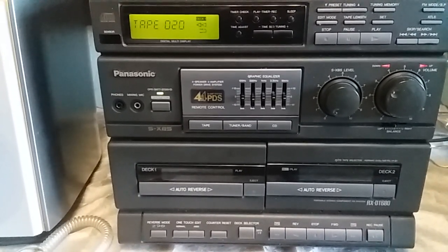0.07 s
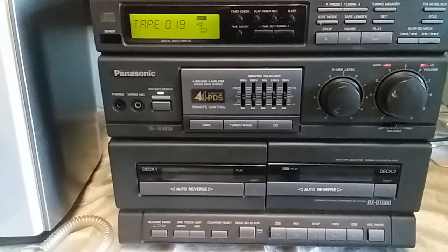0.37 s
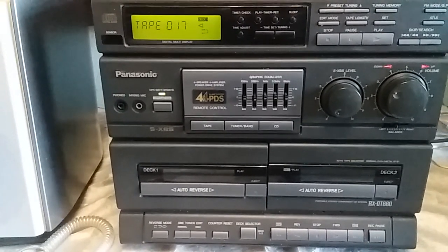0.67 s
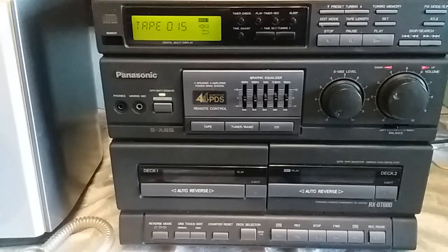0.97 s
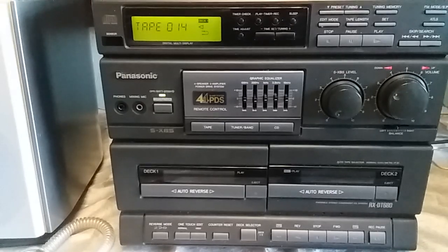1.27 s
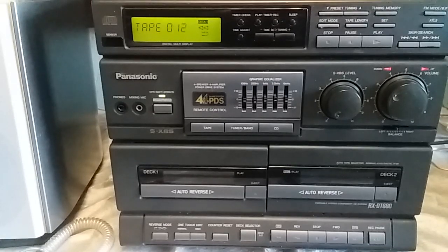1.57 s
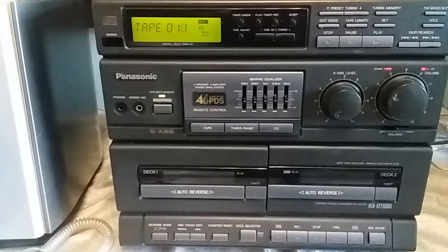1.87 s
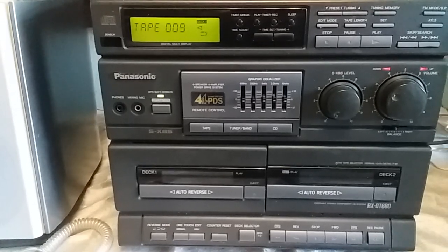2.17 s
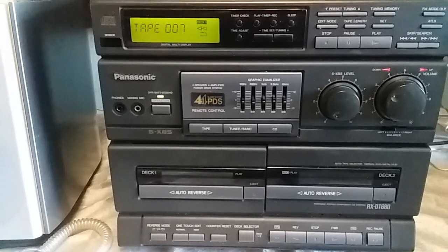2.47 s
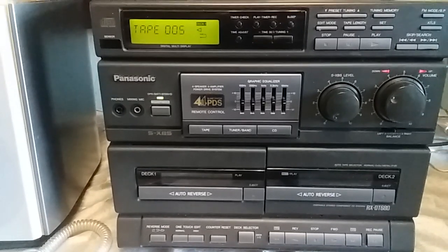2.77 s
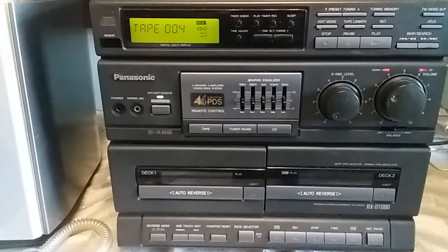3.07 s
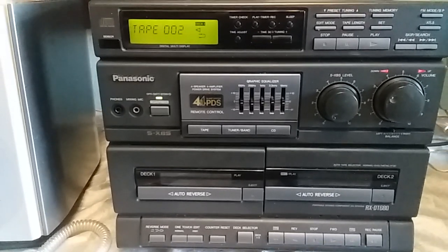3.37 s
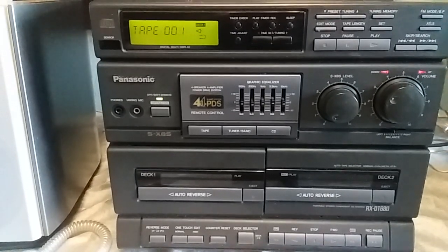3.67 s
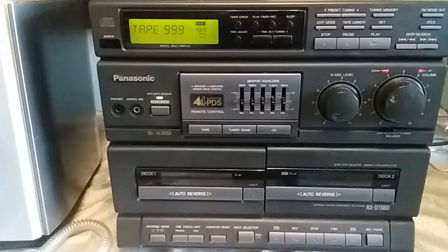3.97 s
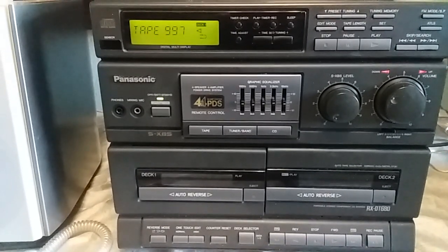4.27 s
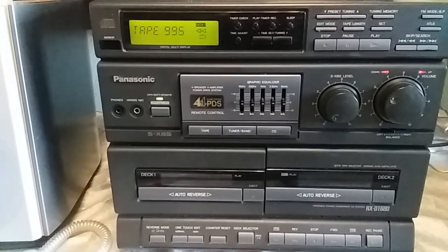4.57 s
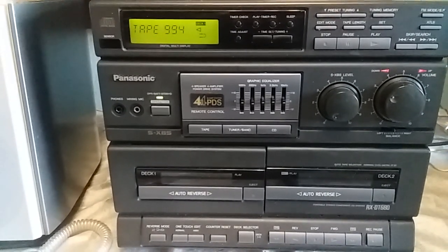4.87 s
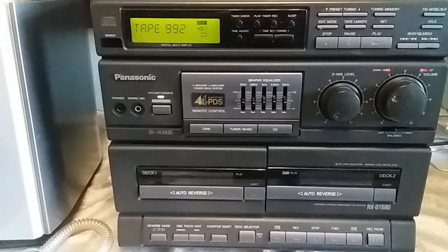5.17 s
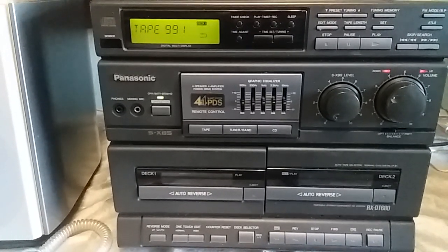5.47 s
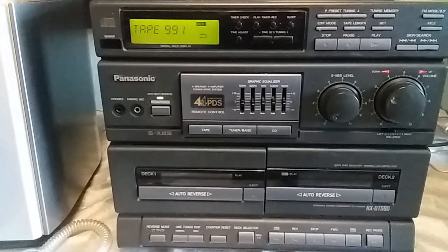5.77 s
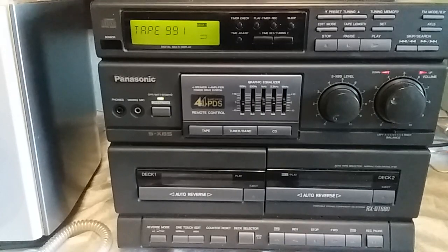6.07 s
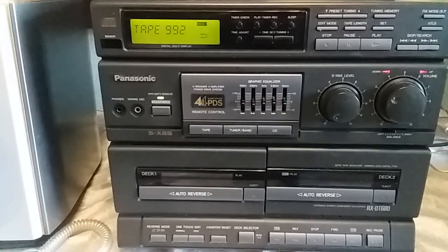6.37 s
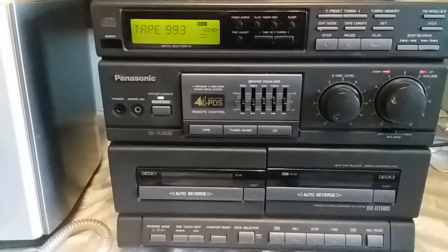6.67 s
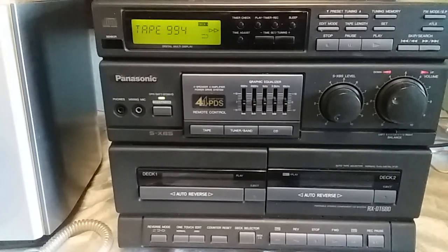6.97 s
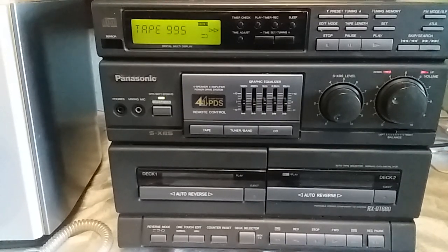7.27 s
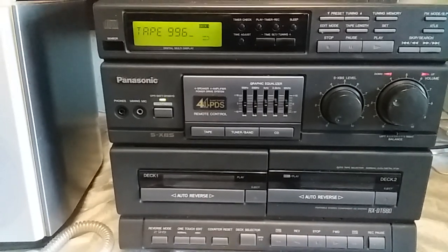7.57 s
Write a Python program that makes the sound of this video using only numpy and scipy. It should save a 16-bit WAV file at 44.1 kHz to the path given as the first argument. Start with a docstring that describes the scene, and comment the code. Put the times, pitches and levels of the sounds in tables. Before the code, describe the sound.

A cassette deck rewinds quickly, its gears whirring in a plastic housing over tape hiss. A low throbbing drone joins as the reel nears its end. The tape runs out, the motor idles briefly, and the mechanism stops with a loud clack. Levers click and a gear grumbles, then a quieter forward wind whines for about a second before a last heavy clack. The deck is heard from straight ahead in a small room.

```python
"""Gear teeth whirr in a plastic shell over tape hiss and motor hum: a cassette deck rewinds in a small room.
The tape pulls tight and the nearly empty reel drones on its spindle. The tape runs out; the motor idles
against its slipping clutch until the head plate clacks to its stop. A grumbling cam trips levers,
a quieter forward wind follows, and a last heavy clack stops the deck. Blows ring chassis and cabinet."""
import sys
import numpy as np
from scipy import signal
from scipy.fft import rfft, irfft
from scipy.io import wavfile
from scipy.ndimage import uniform_filter1d, map_coordinates

SR = 44100
rng = np.random.default_rng(int(sys.argv[2]) if len(sys.argv) > 2 else 0)


def generate_wav(signal):
    """Clip the signal to [-1, 1] and save it as 16-bit WAV at the path in sys.argv[1]."""
    frames = np.transpose(np.atleast_2d(signal))
    scaled = np.clip(frames, -1, 1) * 32767
    pcm = np.round(scaled).astype(np.int16)
    wavfile.write(sys.argv[1], SR, pcm)


N = 335601
TAPS = 16384
T = np.arange(N) / SR
HZ = np.maximum(np.arange(TAPS // 2 + 1) * SR / TAPS, 1)

REEL_HZ = 11.0
TAPE_END_S, LATCH_S, FORWARD_START_S, STOP_S = 4.81, 5.32, 6.27, 7.37
CAM_START_S, CAM_STOP_S = 5.58, 6.26

# Broad spectra: f/Hz, relative level/dB
REWIND_SPECTRUM = [(35, -63), (60, -34), (130, -17), (220, -11), (340, -9), (480, -11), (817, -14.5),
                   (1030, -6.5), (1650, -3.5), (3020, -10.5), (4800, -6), (6000, -15), (8000, -19),
                   (9100, -40)]
ROOM_NOISE_SPECTRUM = [(25, -14.5), (70, 2), (130, -1.5), (300, -7.5), (1000, -4), (3000, -15),
                       (9000, -20.5), (11000, -22.5), (13000, -20), (16000, -13)]
IDLE_SPECTRUM = [(35, -64.5), (60, -35), (129, -7.5), (162, -15.5), (282, -7.5), (307, -16), (371, -5.5),
                 (813, -13), (1070, -1.5), (1190, -5.5), (1740, -6), (2900, -25.5), (4340, -20),
                 (7370, -20), (9500, -53), (12400, -80.5), (20900, -120)]
CHASSIS_SPECTRUM = [(35, -50.5), (60, -17), (130, -3), (168, -15.5), (289, 0), (422, -5.5), (509, -8.5),
                    (916, -6), (1480, -2), (2670, -7.5), (6850, -18.5), (9000, -25.5), (11700, -53),
                    (19800, -120)]
SNAP_SPECTRUM = [(2000, -21), (3000, -2.5), (5000, -3.5), (7000, -4), (8200, -10.5), (9300, -28.5),
                 (11300, -26.5), (12800, -9.5), (14000, -20.5), (16000, -25.5)]
CAM_SPECTRUM = [(50, -24), (88, 0), (130, 2.5), (290, 0), (450, -5), (1000, 2), (1800, -19), (3000, -37),
                (8000, -51)]
FORWARD_SPECTRUM = [(35, -52.5), (60, -26), (315, -36), (357, -27), (467, -33), (599, -21.5), (906, -26.5),
                    (1140, -8), (1340, -14.5), (1490, -7.5), (1760, -21), (1950, -17), (2300, -33.5),
                    (8500, -64), (11000, -85), (18700, -120)]
# Resonances and dips of the parts: f/Hz, width/Hz, lift/dB
SHELL_MODES = [(362, 51, 11), (506, 27, 4.5), (635, 120, 4), (1053, 43, 10.5), (1280, 42, 1.5),
               (1450, 48, 2.5), (1614, 55, 9), (1745, 34, 5.5), (1915, 230, 6.5), (2264, 45, 14),
               (2498, 144, 14), (2764, 44, 8.5), (3300, 20, 7), (3876, 120, 6.5), (4270, 81, 9),
               (4630, 124, 11), (5030, 690, 5.5), (7270, 170, 13.5)]
DRIVE_MODES = [(141, 7.1, 17), (268, 25, 9.5), (369, 21, 10.5), (580, 48, 7.5), (1036, 90, 5.5),
               (1160, 87, -2.5), (1987, 71, 6.5), (2510, 150, 14.5)]
CLUTCH_MODES = [(2750, 450, -3), (3700, 500, -4), (4350, 250, 6.5), (4800, 190, 4.5), (5700, 165, 10.5),
                (7300, 250, 7.5)]
CHASSIS_MODES = [(523, 40, 5.5), (589, 23, 9), (874.6, 40, 6.5), (1048, 50, 7.5), (1200, 46, 6),
                 (1497, 72, 4.5), (1699, 46, 7.5), (1865, 67, 7), (2274, 110, 2), (2434, 31, 2.5),
                 (3215, 200, 9.5), (3428, 50, 5.5), (4340, 152, 5), (5140, 107, 2.5), (6900, 220, 5.5),
                 (7930, 140, 5)]
FORWARD_GEAR_MODES = [(1546, 27, 13.5), (2950, 330, -13)]
# Tones of motor and pulleys, and of the electronics: f/Hz, relative level/dB
MOTOR_TONES = [(134.6, -74.5), (204.6, -87), (279.9, -68), (349.9, -63)]
WHISTLE_TONES = [(14686, -82)]
# Reel hub pitch: t/s, f/Hz
HUB_PITCH = [(3.64, 340), (3.746, 372.5), (3.794, 372), (3.826, 354.2), (4.096, 337.9), (4.356, 337.9),
             (4.414, 354), (4.462, 337.5), (4.78, 340.6)]
# Transport drops out of gear: t/s, force/dB, weight/dB, relative boom/dB, slide lead/s, delay factor,
# plate ring/Hz
TRANSPORT_STOPS = [(5.3164, 3.0, 0.5, -29, .0095, 0.97, 511.6), (7.3656, -7, 1.5, -34, .0125, .9, 1514)]
# Contacts per stop (plate hits, latch snaps, latch seats, plate rebounds): delay/s, relative clack/dB,
# thud/dB, snap/dB, force share, rise/s, decay/s, high ring/Hz
STOP_CONTACTS = [(0, -21, -35, -26.5, 0.8, 0.0027, 0.0064, 4230),
                 (0.0324, -27, -40.5, -18.5, .05, .0005, .0045, 6520),
                 (.039, -27, -38.5, -35.5, .25, .001, .0065, 3450),
                 (.059, -29, -36.5, -32.5, .05, .0028, 0.0063, 3700)]
# Levers and pawls tripped by the cam: t/s, relative clack/dB, thud/dB, snap/dB, ring/Hz
LEVER_TRIPS = [(5.5767, -36, -64, -39, 1470), (5.613, -37, -51, -42.5, 1260),
               (5.662, -40.5, -61, -37.5, 1530), (5.686, -36.5, -66, -35.5, 1980),
               (5.762, -52.5, -54, -68, 950), (5.844, -53, -61, -62, 1060), (5.858, -48, -55, -48, 1090),
               (5.898, -50.5, -65, -63, 1870), (5.951, -34.5, -53, -37.5, 1570), (5.99, -49, -46, -56, 885),
               (6.04, -37, -52, -48, 1660), (6.06, -29.5, -36, -34, 1147), (6.091, -35, -45, -38.5, 1470),
               (6.159, -44, -52, -44.5, 1550), (6.283, -33, -42, -40, 1950)]
# Deep cabinet modes: f/Hz, relative level/dB, t60/s
CABINET_MODES = [(72, -23.5, .16), (104, -18.5, 0.11), (139.7, -5, 0.27), (201.3, -11, 0.22),
                 (298, -8.5, 0.17), (515, -11.5, 0.15), (597, -12, .22)]
# Room decay: f/Hz, t60/s
ROOM_DECAY = [(250, 0.27), (500, .3), (1500, 0.22), (5000, 0.18), (9000, 0.063), (14000, 0.12)]
# Cam slowing against a spring: t/s, length/s, start f/Hz, sag/(Hz/s), level/dB
CAM_GROANS = [(5.67, .11, 318, 560, -56.5), (5.965, .1, 302, 270, -50.5)]
# Shudders as the cam ends its travel and the forward gears engage: t/s, level/dB
DRIVE_SHUDDERS = [(6.058, -51), (6.289, -54.5)]


def from_db(db):
    """Decibels to gain."""
    return 10 ** (np.asarray(db) / 20)


def unit_rms(x):
    """Scale to unit power."""
    return x / np.sqrt(np.mean(x ** 2) + 1e-20)


def at_hz(points, hz):
    """Read a curve on a log-frequency axis."""
    f_hz, value = np.transpose(points)
    return np.interp(np.log(hz), np.log(f_hz), value)


def drift(rate_hz):
    """Random wander, RMS 1."""
    knots = rng.standard_normal(4096)
    return unit_rms(np.interp(T * rate_hz, np.arange(len(knots)), knots))


def sine(hz):
    """Sine of varying pitch."""
    return np.sin(2 * np.pi * np.cumsum(hz) / SR)


def gate(start_s, stop_s, ramp_s):
    """1 from start to stop, ramped ends."""
    return np.clip((T - start_s) / ramp_s + .5, 0, 1) * np.clip((stop_s - T) / ramp_s + .5, 0, 1)


def below(hz, order=8):
    """Low-pass gain."""
    return 1 / np.sqrt(1 + (HZ / hz) ** (2 * order))


def above(hz, order=8):
    """High-pass gain."""
    return 1 / np.sqrt(1 + (hz / HZ) ** (2 * order))


def response(spectrum, modes):
    """Gain per frequency: broad spectrum plus modes, less their local mean."""
    lift_db = sum(db / (1 + (2 * (HZ - hz) / width_hz) ** 2) for hz, width_hz, db in modes)
    return from_db(at_hz(spectrum, HZ) + lift_db - uniform_filter1d(lift_db, size=220))


def impulse(gain, band_hz):
    """Minimum-phase ring of a response, unit power in the band."""
    gain = gain / np.sqrt(np.mean(gain ** 2 * (HZ > band_hz[0]) * (HZ < band_hz[1])))
    cepstrum = irfft(np.log(gain + 1e-7))
    fold = 1 + np.sign(TAPS // 2 - np.arange(TAPS))
    fold[0] = 1
    return irfft(np.exp(rfft(cepstrum * fold)))


def through(x, ring):
    """Convolve, cut to N."""
    return signal.fftconvolve(x, ring)[:N]


def gear(turn_hz, mesh_hz, tooth_db, wobble_db, worn, whine, flutter):
    """Tooth-pulsed rubbing plus mesh whine. Worn spots recur each turn; an off-centre wheel warbles."""
    turns = turn_hz * (T + np.cumsum(.008 * drift(3)) / SR)
    surface = rng.standard_normal(4000)
    spots = unit_rms(map_coordinates(surface, [turns % 1 * len(surface)], order=3, mode="wrap"))
    rub = np.sqrt(worn) * spots + np.sqrt(1 - worn) * rng.standard_normal(N)
    load_knots = signal.detrend(rng.standard_normal(12))
    load = unit_rms(np.interp(turns, np.arange(12) / 12, load_knots, period=1))
    speed = 1 + flutter * np.sin(2 * np.pi * turns) + .00913 * drift(45)
    teeth = np.cumsum(mesh_hz * speed) / SR
    push = irfft(np.exp(2j * np.pi * rng.random(60)) * (np.arange(60) > 0), 1024)   # equal harmonics
    meshing = unit_rms(np.interp(teeth % 1 * len(push), np.arange(len(push)), push))
    rub = unit_rms(rub * from_db(tooth_db * np.cos(2 * np.pi * teeth)))
    force = np.sqrt(1 - whine) * rub + np.sqrt(whine) * meshing
    return unit_rms(force * from_db(wobble_db * load))


def rewind():
    """Gears whirr in the shell, tape hisses past its guides; both grow with strain."""
    strain_db = 2 * tape_strain()
    turn_rad = 2 * np.pi * REEL_HZ * (T + np.cumsum(.019 * drift(3.15)) / SR)
    whirr_db = -49.5 + strain_db + 1.26 * np.sin(2 * turn_rad)   # hub rocks twice a turn
    hiss_db = -54 + strain_db + .8 * np.sin(turn_rad)   # tape brushes once a turn
    gears = gear(REEL_HZ, mesh_hz=323, tooth_db=1.5, wobble_db=.6, worn=.5, whine=.22, flutter=.035)
    tape = gear(REEL_HZ, mesh_hz=298, tooth_db=1.5, wobble_db=.7, worn=.5, whine=.25, flutter=.034)
    shell = response(REWIND_SPECTRUM, SHELL_MODES) * below(8700, order=24)
    whirr = through(gears * from_db(whirr_db), impulse(shell * below(2685), (900, 2800)))
    hiss = through(tape * from_db(hiss_db), impulse(shell * above(2710), (3000, 9000)))
    return whirr * gate(-1, TAPE_END_S, ramp_s=.065) + hiss * gate(-1, TAPE_END_S - .02, ramp_s=.084)


def motor(gain_db):
    """Wavering hum of motor and pulleys."""
    hum = sum(from_db(db + 2 * drift(15)) * sine(hz * (1 + .0037 * drift(7.9))) for hz, db in MOTOR_TONES)
    return from_db(gain_db) * hum * gate(-1, TAPE_END_S, ramp_s=.076)


def background(noise_db, whistle_gain_db):
    """Faint room noise, thin electronic whistle."""
    ring = impulse(from_db(at_hz(ROOM_NOISE_SPECTRUM, HZ)), (20, 16000))
    air = unit_rms(through(rng.standard_normal(N), ring))
    whistle = sum(from_db(db + whistle_gain_db) * np.sin(2 * np.pi * hz * T) for hz, db in WHISTLE_TONES)
    return from_db(noise_db) * air + whistle


def tape_strain(start_s=3.565, rise_s=.11, hold_s=.13, ease_s=.13, residual=.25):
    """Tape pull on the nearly empty reel, 0-1: builds, holds, eases."""
    rise = np.clip((T - start_s) / rise_s, 0, 1)
    eased = np.exp(-np.maximum(T - start_s - rise_s - hold_s, 0) / ease_s)
    return rise * (residual + (1 - residual) * eased)


def hub_drone(start_s=3.65, hold_s=.27, settle_s=.13, loud_db=-46.5, settled_db=-52):
    """The nearly empty reel chatters on its spindle near the shell's lowest mode."""
    hz = np.interp(T, *np.transpose(HUB_PITCH)) * (1 + .0088 * drift(70))
    settled = np.clip((T - start_s - hold_s) / settle_s, 0, 1)
    level_db = loud_db + (settled_db - loud_db) * settled
    throb_db = 2.4 * np.sin(4 * np.pi * REEL_HZ * T) + drift(35)
    return from_db(level_db + throb_db) * sine(hz) * gate(start_s, TAPE_END_S - .025, ramp_s=.025)


def clutch_idle():
    """Reels stand still; the clutch slips with a faint squeal."""
    force = gear(turn_hz=2.9, mesh_hz=313, tooth_db=1.5, wobble_db=2, worn=.15, whine=.068, flutter=.011)
    level_db = -58 + .6 * drift(7.5)
    gain = response(IDLE_SPECTRUM, DRIVE_MODES + CLUTCH_MODES) * below(7900, order=20)
    ring = impulse(gain, (800, 2800))
    return through(force * from_db(level_db) * gate(TAPE_END_S, LATCH_S, ramp_s=.04), ring)


def blows():
    """Stop and lever contacts: t/s, clack/dB, thud/dB, snap/dB, rise/s, decay/s, two rings/Hz."""
    for s, force_db, weight_db, _, slide_s, pace, low_hz in TRANSPORT_STOPS:
        yield s - slide_s, -31, -41, -34, .005, .013, (1330, 5200)   # head plate slides to its stop
        for delay_s, clack_db, thud_db, snap_db, share, rise_s, decay_s, high_hz in STOP_CONTACTS:
            push_db = force_db * share
            levels_db = clack_db + push_db, thud_db + weight_db, snap_db + push_db
            yield s + pace * delay_s, *levels_db, rise_s, decay_s, (low_hz, high_hz)
    for s, *levels_db, low_hz in LEVER_TRIPS:
        yield s, *levels_db, .0021, .0075, (low_hz, rng.uniform(3150, 6900))


def rattle(rise_s, decay_s, grit_db):
    """Burst of tiny hard contacts that swells and dies."""
    t = T[:4096]
    envelope = (1 - np.exp(-t / rise_s)) ** 2 * np.exp(-t / decay_s)
    envelope /= envelope.max()
    noise, grit = rng.standard_normal((2, len(t)))
    contacts = noise * from_db(grit_db * grit) * envelope
    for _ in range(2):   # flatten the spectrum, keep the burst short
        contacts = irfft(np.exp(1j * np.angle(rfft(contacts)))) * envelope ** .14
    return unit_rms(contacts) * np.sqrt(np.mean(envelope ** 2))


def part_ring(contacts, rings_hz, q, lift):
    """The struck part adds its resonances; power is preserved."""
    ringing = sum(signal.lfilter(*signal.iirpeak(hz, q, fs=SR), contacts) for hz in rings_hz)
    return unit_rms(contacts + lift * ringing) * np.sqrt(np.mean(contacts ** 2))


def chassis_clacks(thud_gain_db, snap_gain_db):
    """Each blow shakes the chassis: weight thuds, parts clack, hard edges snap."""
    forces = np.zeros((3, N))
    for s, clack_db, thud_db, snap_db, rise_s, decay_s, rings_hz in blows():
        contacts = part_ring(rattle(rise_s, decay_s, grit_db=2.5), rings_hz, q=21, lift=1.6)
        gains = from_db([thud_db + thud_gain_db, clack_db, snap_db + snap_gain_db])
        at = int(s * SR)
        forces[:, at:at + len(contacts)] += np.outer(gains, contacts)
    chassis = response(CHASSIS_SPECTRUM, CHASSIS_MODES)
    thud = impulse(chassis * below(438), (80, 500))
    clack = impulse(chassis * above(478) * below(2600), (600, 2800))
    snap = impulse(response(SNAP_SPECTRUM, CHASSIS_MODES) * above(3050), (3000, 14000))
    return sum(through(force, ring) for force, ring in zip(forces, (thud, clack, snap)))


def room(x, onset_s):
    """Diffuse reflections: quick build-up, shorter decay in the treble."""
    t, edges_hz = T[:TAPS], np.geomspace(220, 17000, 10)
    tail = 0
    for low_hz, high_hz in zip(edges_hz, edges_hz[1:]):
        band = signal.butter(2, [low_hz, high_hz], "band", fs=SR, output="sos")
        t60_s = at_hz(ROOM_DECAY, np.sqrt(low_hz * high_hz))
        tail += signal.sosfilt(band, rng.standard_normal(TAPS)) * from_db(-60 * t / t60_s)
    tail *= np.clip(t / onset_s - .5, 0, 1)
    return through(x, tail / np.linalg.norm(tail))


def cabinet_boom(gain_db, stop_lag_s=.022):
    """Stops and levers jolt the cabinet's modes; the small box radiates almost no deep bass."""
    jolts = np.zeros(N)
    for s, _, _, boom_db, *_ in TRANSPORT_STOPS:
        jolts[int((s + stop_lag_s) * SR)] = from_db(boom_db)
    for s, _, thud_db, *_ in LEVER_TRIPS:
        jolts[int(s * SR)] = from_db(thud_db)
    t = T[:TAPS]
    ring = sum(from_db(db - 60 * t / t60_s) * np.sin(2 * np.pi * hz * t) for hz, db, t60_s in CABINET_MODES)
    ring = signal.sosfilt(signal.butter(4, 65, "high", fs=SR, output="sos"), ring)
    return from_db(gain_db) * through(jolts, ring)


def cam_grumble(free_db=-75, load_gain_db=-15, relief_db_per_s=119):
    """The cam gear grumbles; each lever adds a load that dies away."""
    loads = [from_db(clack_db + load_gain_db - relief_db_per_s * np.abs(T - s)) * (T > s)
             for s, clack_db, *_ in LEVER_TRIPS]
    level = from_db(free_db) + np.max(loads, axis=0)
    force = rng.standard_normal(N) * level * gate(CAM_START_S, CAM_STOP_S, ramp_s=.037)
    return through(force, impulse(response(CAM_SPECTRUM, DRIVE_MODES), (60, 3000)))


def cam_groans():
    """The cam sags in pitch as it tensions a spring."""
    out = 0
    for s, length_s, start_hz, sag_hz_per_s, db in CAM_GROANS:
        hz = (start_hz - sag_hz_per_s * np.clip(T - s, 0, length_s)) * (1 + .0163 * drift(80))
        out += from_db(db + 1.2 * drift(66)) * sine(hz) * gate(s, s + length_s, ramp_s=.045)
    return out


def drive_shudders(centre_hz=111, width_hz=48, fade_db_per_s=124):
    """The drive rumbles briefly when its load changes."""
    resonance = signal.iirpeak(centre_hz, centre_hz / width_hz, fs=SR)
    shake = signal.lfilter(*resonance, rng.standard_normal(N))
    shake = unit_rms(through(shake, impulse(above(80) * below(200), (80, 200))))
    return shake * sum(from_db(db - fade_db_per_s * np.abs(T - s)) * gate(s, np.inf, ramp_s=.012)
                       for s, db in DRIVE_SHUDDERS)


def forward_wind():
    """A lighter gear train runs with a narrow whine."""
    force = gear(turn_hz=9.3, mesh_hz=378, tooth_db=-4.5, wobble_db=1, worn=.28, whine=.038, flutter=.02)
    level_db = -55 + drift(10)
    ring = impulse(response(FORWARD_SPECTRUM, DRIVE_MODES + FORWARD_GEAR_MODES), (800, 2800))
    return through(force * from_db(level_db) * gate(FORWARD_START_S, STOP_S, ramp_s=.017), ring)


def scene():
    """Deck straight ahead, near mono; only the clacks feed the room."""
    clacks = chassis_clacks(thud_gain_db=-3.5, snap_gain_db=-3)
    deck = rewind() + hub_drone() + motor(gain_db=3.5) + clutch_idle() + clacks + cabinet_boom(gain_db=-3)
    deck += cam_grumble() + cam_groans() + drive_shudders() + forward_wind()
    mid = deck + from_db(-10.5) * room(clacks, onset_s=.0047)
    mid += background(noise_db=-70, whistle_gain_db=1.5)
    side = from_db(-61) * room(clacks, onset_s=.003) + from_db(-90) * rng.standard_normal(N)
    return np.array([mid + side, mid - side])


def record(dry):
    """Steep low-pass at 15.9 kHz."""
    return signal.sosfilt(signal.ellip(12, .1, 80, 15900, fs=SR, output="sos"), dry)


dry = scene()
out = record(dry)
generate_wav(out)
```